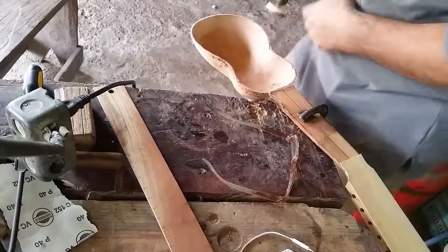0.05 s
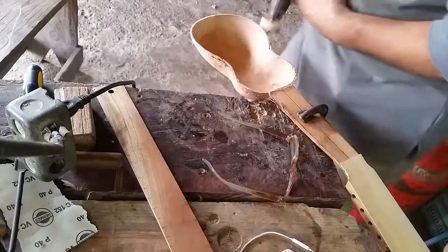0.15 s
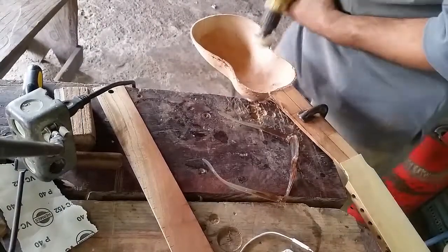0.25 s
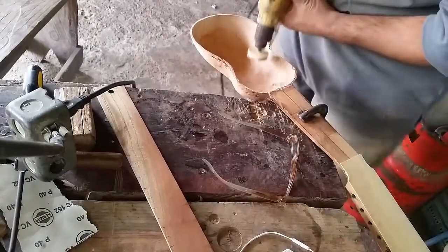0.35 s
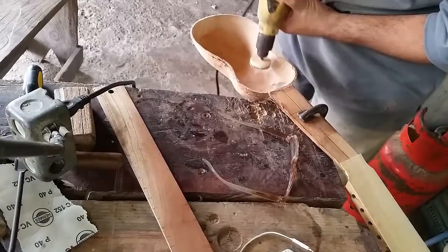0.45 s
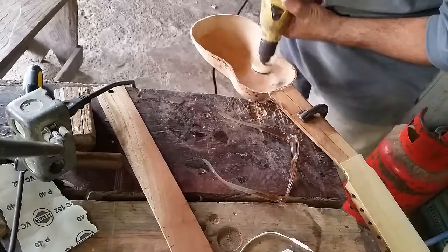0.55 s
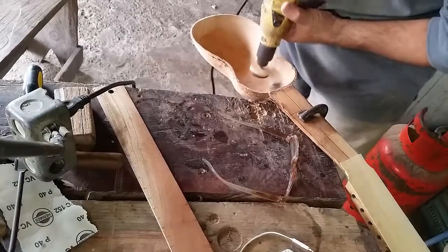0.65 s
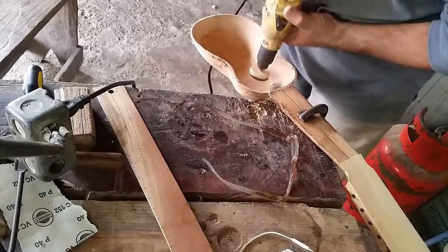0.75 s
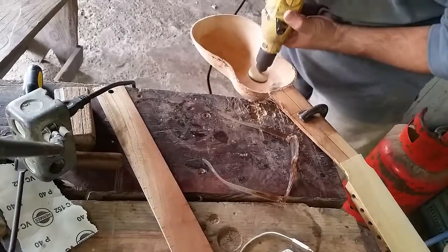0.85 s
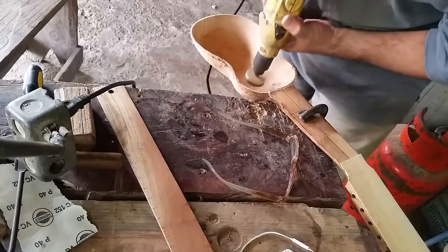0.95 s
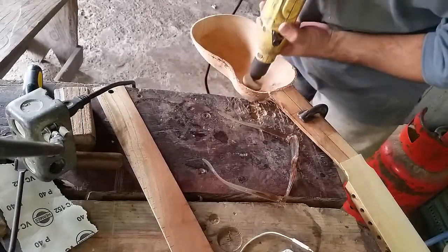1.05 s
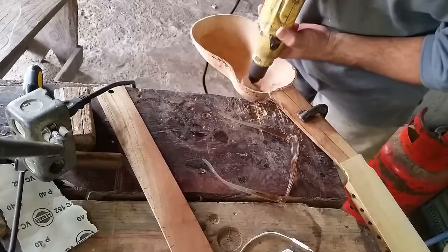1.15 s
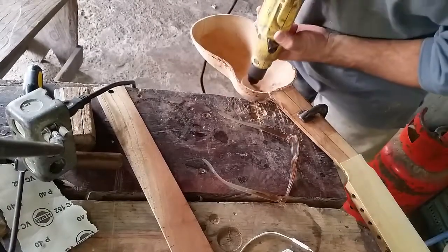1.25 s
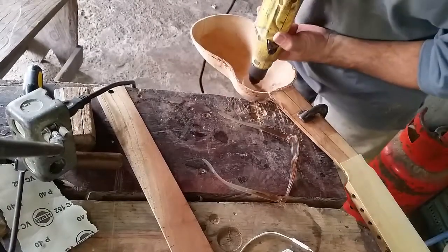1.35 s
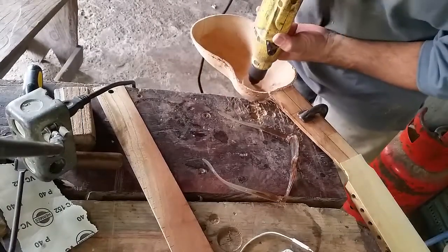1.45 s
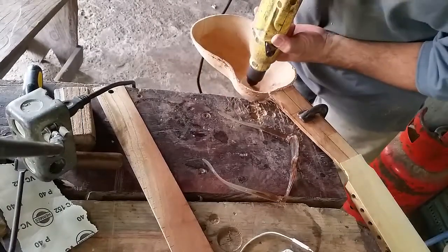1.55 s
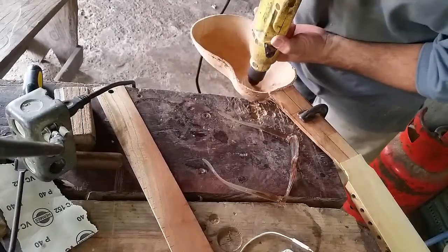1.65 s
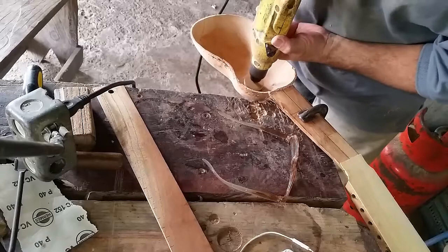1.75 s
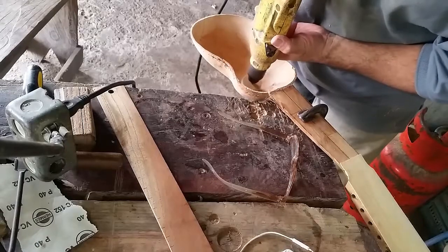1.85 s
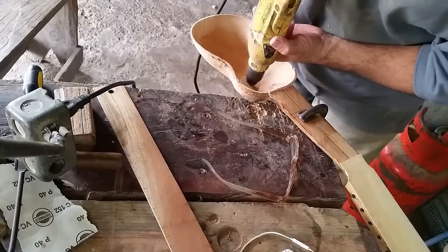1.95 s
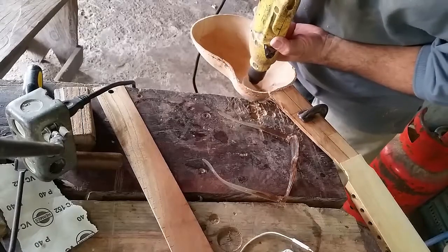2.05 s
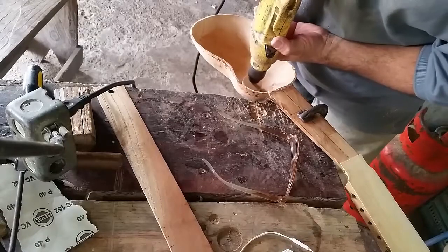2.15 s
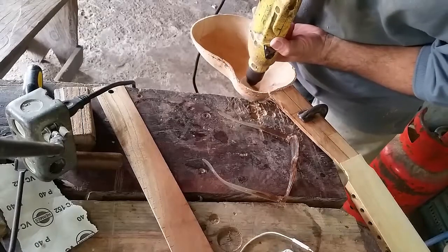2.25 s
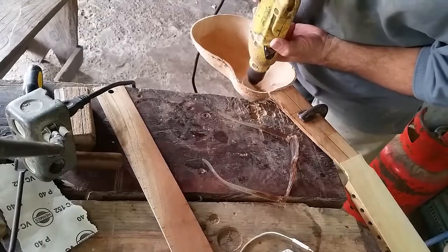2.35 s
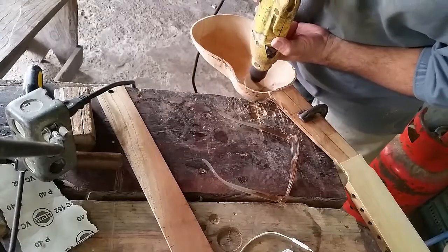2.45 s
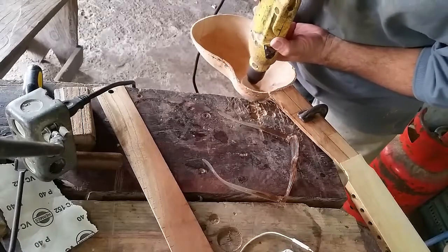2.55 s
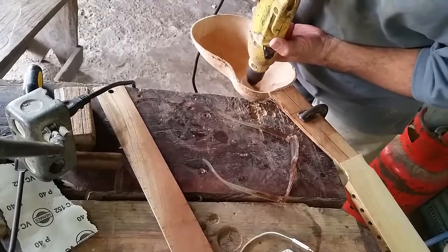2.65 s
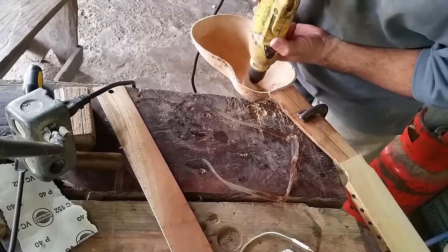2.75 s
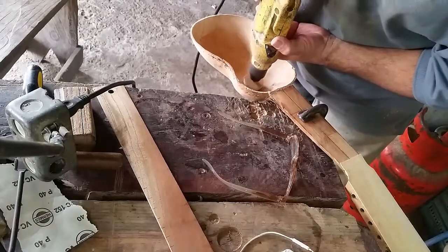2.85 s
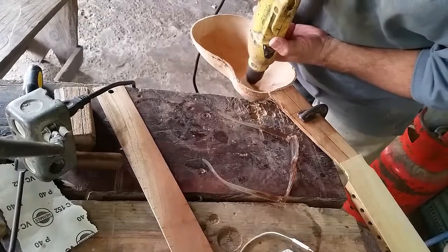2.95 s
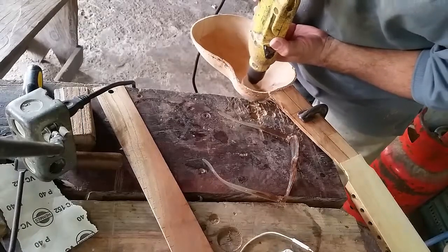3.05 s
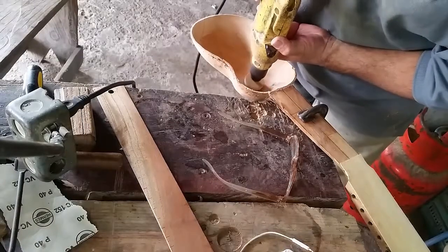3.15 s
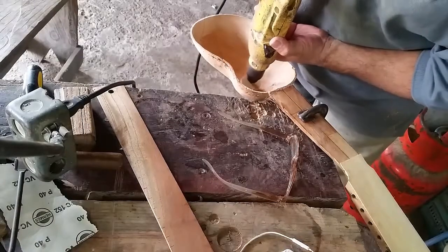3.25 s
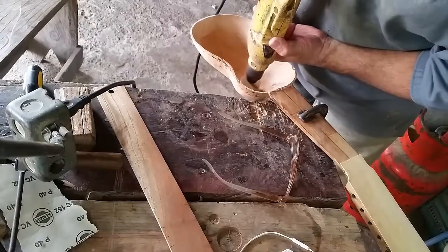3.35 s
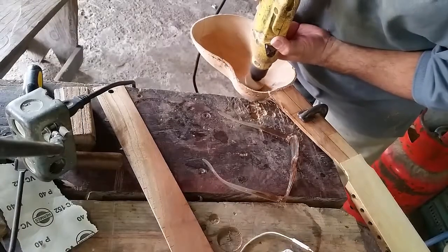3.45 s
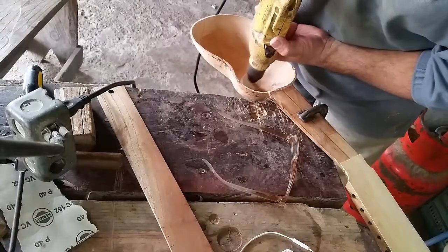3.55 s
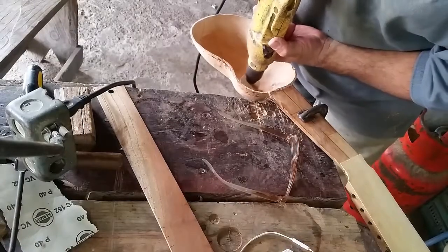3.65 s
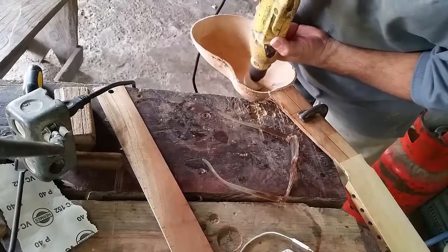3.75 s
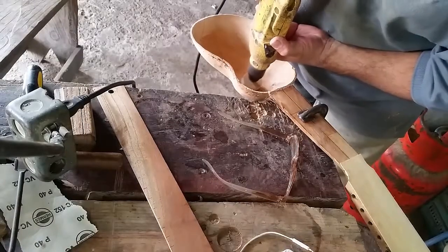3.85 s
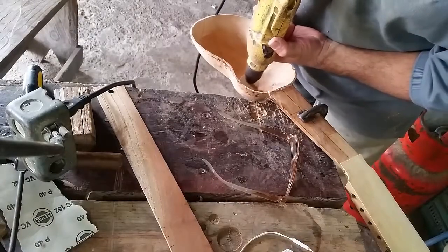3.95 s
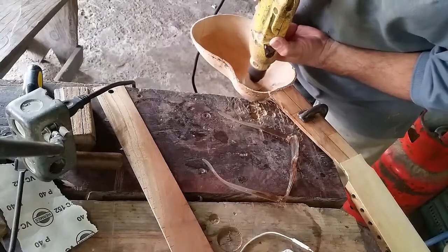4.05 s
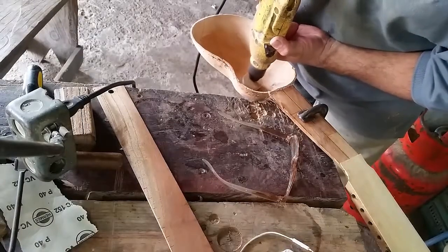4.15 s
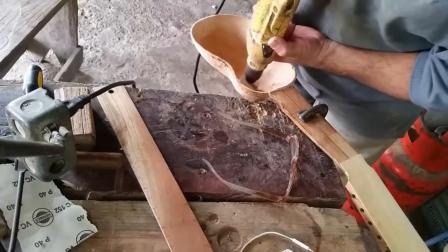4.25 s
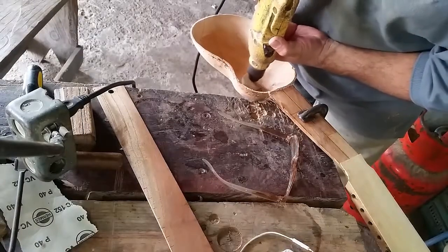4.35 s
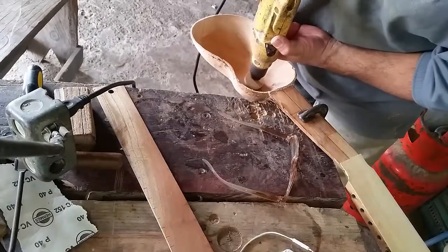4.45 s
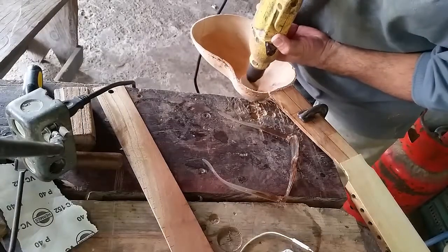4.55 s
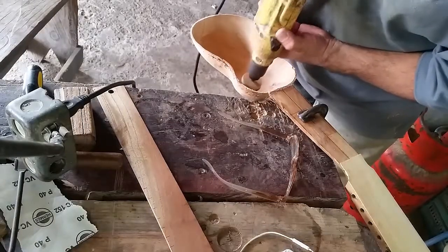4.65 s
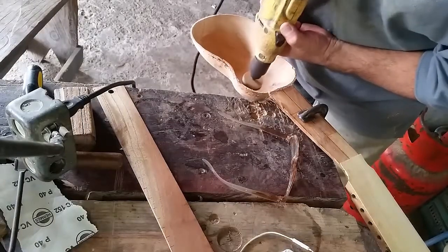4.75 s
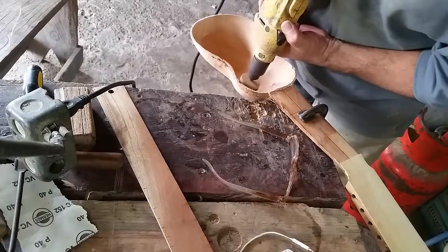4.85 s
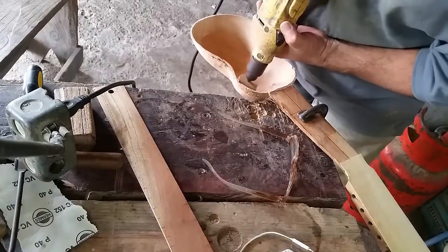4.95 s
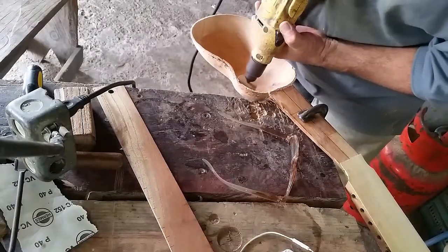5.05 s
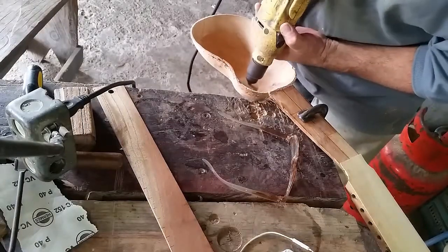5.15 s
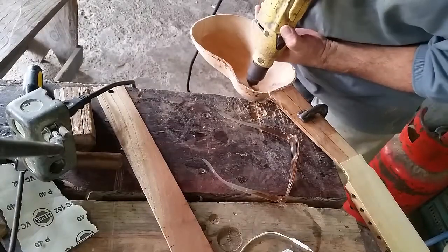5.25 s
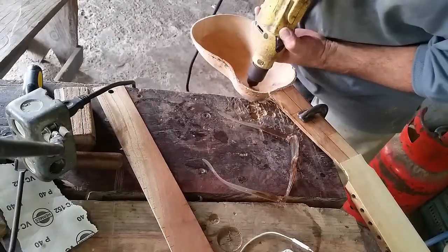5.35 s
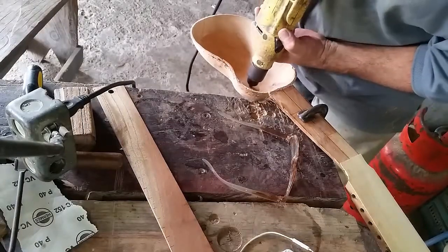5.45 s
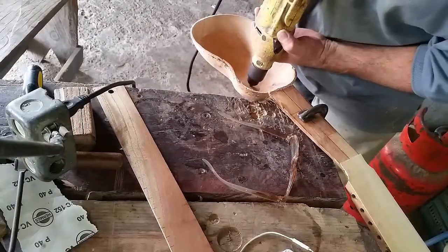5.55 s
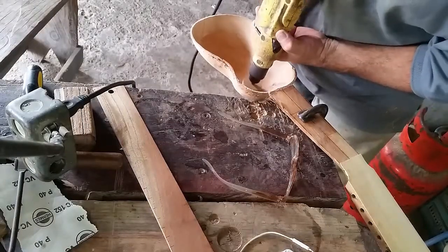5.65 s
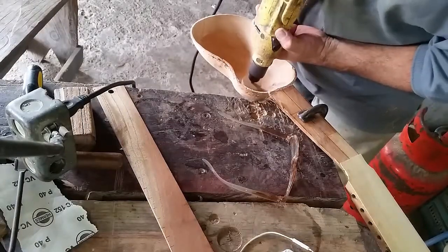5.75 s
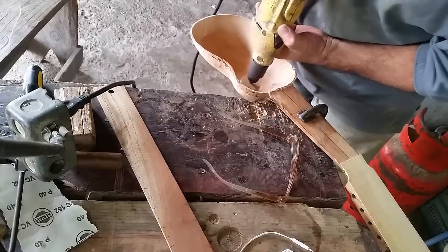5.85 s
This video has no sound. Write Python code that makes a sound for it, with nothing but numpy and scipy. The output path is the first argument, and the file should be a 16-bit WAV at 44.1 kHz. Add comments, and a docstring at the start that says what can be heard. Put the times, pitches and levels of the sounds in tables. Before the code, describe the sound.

An electric drill spins up to a high whine, its sanding drum rasping steadily inside a wooden bowl in short strokes.

```python
"""A machine hums in a workshop, then a corded drill clicks on, speeds up and sands a small wooden bowl.
The drill's cooling fan whines and its shaft buzzes, both rising in pitch as the motor gains speed.
Grit on the sanding drum scratches the wood inside a rush of air, and flares with each stroke.
The hum sinks away once the drill runs. Nearly all the sound reaches the left microphone."""
import sys
import numpy as np
from scipy import signal
from scipy.fft import rfft, irfft
from scipy.io import wavfile

SR = 44100
rng = np.random.default_rng(int(sys.argv[2]) if len(sys.argv) > 2 else 0)


def file_out(sig):
    """Save sig as 16-bit WAV at sys.argv[1]."""
    # one column per channel
    cols = np.atleast_2d(sig).T
    # limit, then scale
    lim = np.clip(cols, -1, 1)
    pcm = np.round(lim * 32767).astype(np.int16)
    wavfile.write(sys.argv[1], SR, pcm)


N = 259749
T = np.arange(N) / SR
HZ = np.fft.rfftfreq(N, 1 / SR)
START_S = 0.654  # the trigger is pulled
RUN_S = np.maximum(T - START_S, 0)  # time since then
BLADES, TOP_HZ = 13, 6433  # the fan's blades, and their pitch at full speed


def drill():
    """The whole drill at work. At first its tones and sparks throb strongly, its noise only a little."""
    blade_hz = fan_pitch()
    tones_and_sparks = (motor(blade_hz) + brush_sparks()) * current_throb(depth=.8, settle_s=.125)
    noises = (sanding(blade_hz) + gear_ring()) * current_throb(depth=.15, settle_s=.076)
    return tones_and_sparks + noises + switch_on()


def motor(blade_hz, jitter=0.00042, calm_s=0.81):
    """The fan and the shaft turn together, and are least steady while they gain speed."""
    unrest = np.exp(-RUN_S / calm_s)
    turns_per_s = blade_hz / BLADES * (1 + jitter * drift(29.2))
    angle = 2 * np.pi * np.cumsum(turns_per_s) / SR
    return fan_whine(blade_hz, BLADES * angle, unrest) + shaft_buzz(blade_hz, angle, unrest)


# How loud the whine is as the drill turns in the hand: time_s, level_db
WHINE_LEVELS = [(.66, -45), (1.3, -42), (1.6, -42.5), (1.82, -42.5), (1.95, -40.5), (2.02, -48),
                (2.29, -41.5), (2.5, -43.5), (2.9, -44.5), (3.45, -43), (3.95, -43.5), (4.62, -41.5),
                (4.76, -47), (5.2, -45.5), (5.48, -47), (5.67, -43.5), (5.89, -46)]
# Brief dips in the whine: time_s, half_width_s, gain_db
WHINE_DIPS = [(1.14, 0.023, -4), (1.7, .035, -10), (2.07, 0.037, -9), (2.38, 0.031, -8),
              (2.73, 0.083, -3.5), (3.24, .04, -5), (3.82, .025, -8), (4.79, .02, -8), (5.56, .025, -14),
              (5.79, 0.042, -24)]
# Pitches that the air vents boost or weaken: pitch_hz, width_hz, gain_db
VENT_RESONANCES = [(1200, 1150, -19), (2310, 1000, 14.5), (3000, 340, -9), (3480, 360, -18), (3880, 640, 9),
                   (4580, 1200, 5.5)]
# How loud the tone an octave above the whine is: time_s, level_db
OCTAVE_LEVELS = [(.78, -71.5), (.98, -58), (1.35, -58), (1.7, -47.5), (1.8, -51.5), (2.48, -45.5),
                 (2.72, -51), (2.98, -46.5), (3.8, -48), (3.9, -50), (4.62, -51), (4.71, -40.5),
                 (4.82, -47.5), (4.95, -45.5), (5.38, -53.5), (5.62, -44), (5.73, -55), (5.89, -53)]
def fan_whine(blade_hz, blade_angle, unrest, conversion_gap_hz=3900):
    """The fan blades make a whine and its octave. The recorder's rate conversion adds
    two thin, faint tones, 3900 Hz above the whine and 3900 Hz below the octave."""
    roughness = np.clip(.95 * (1 - blade_hz / TOP_HZ), 0, 1)
    whine_db = curve(WHINE_LEVELS) + bumps(WHINE_DIPS) + (1.1 + 2 * unrest) * drift(33)
    octave_db = curve(OCTAVE_LEVELS) + (2 + 2 * unrest) * drift(23)
    whine = amp(whine_db + boost_db(blade_hz, VENT_RESONANCES)) * rough_tone(blade_angle, roughness)
    octave = amp(octave_db) * rough_tone(2 * blade_angle, .9 * unrest)
    gap = 2 * np.pi * conversion_gap_hz * T
    under_octave = amp(octave_db - 10 + 1.5 * drift(33)) * rough_tone(2 * blade_angle - gap, roughness)
    over_whine = amp(whine_db - 16 + 1.5 * drift(33)) * rough_tone(blade_angle + gap, roughness)
    return np.sqrt(2) * (whine + octave + under_octave + over_whine * blade_hz / TOP_HZ)


# The tones in the shaft's buzz: cycles_per_turn, level_db
SHAFT_TONES = [(1, -60), (2, -55), (3, -54.5), (4, -53.5), (5, -57), (12, -56)]
# How the hand's grip changes all but the lowest tone: time_s, gain_db
GRIP_GAINS = [(1.3, 1), (1.8, -6), (2.3, -1), (2.52, 0), (2.9, -1), (3.55, 0), (4.1, 0.5), (4.45, 1.5),
              (5.0, -2), (5.4, 2.5)]
# Pitches that the drill's housing boosts or weakens: pitch_hz, width_hz, gain_db
HOUSING_RESONANCES = [(995, 26, 4), (4630, 420, 24), (5900, 500, -6)]
def shaft_buzz(blade_hz, angle, unrest, rattle_radians=.12, swing_dip_db=5.5):
    """The shaft buzzes at multiples of its speed: louder as it speeds up, softer as the hand swings."""
    shaken_angle = angle + rattle_radians * unrest * drift(150)
    grip_db, dip_db = curve(GRIP_GAINS), swing_dip_db * hand_swing(lag_s=-.005)
    buzz = np.zeros(N)
    for multiple, db in SHAFT_TONES:
        housing_db = boost_db(multiple * blade_hz / BLADES, HOUSING_RESONANCES)
        level_db = db + (multiple > 1) * grip_db - dip_db + housing_db + 1.5 * drift(14)
        buzz += amp(level_db) * np.sin(multiple * shaken_angle)
    return np.sqrt(2) * buzz * (blade_hz / TOP_HZ) ** 4.5


# The quick and the slow stage of speeding up: pitch_gained_hz, time_constant_s
SPIN_UP_STAGES = [(2885, .099), (3225, .4395)]
# The speed sags and recovers with the load: time_s, pitch_change_hz
LOAD_SAG = [(1.75, 4), (2.56, -10), (3.05, 6), (3.7, 4), (3.85, -21), (4.52, -52), (4.86, 22), (5.21, 67),
            (5.44, 36), (5.78, -22), (5.89, 0)]
def fan_pitch(lilt_hz=14.98):
    """The whine's pitch in Hz: it climbs, bends under load and lifts a little with each stroke."""
    still_to_gain_hz = sum(hz * np.exp(-RUN_S / lag_s) for hz, lag_s in SPIN_UP_STAGES)
    swing = hand_swing(lag_s=0.033)
    return TOP_HZ - still_to_gain_hz + curve(LOAD_SAG) + lilt_hz * (swing - swing.mean())


# The low, middle and high bands of the sanding noise:
# level_db, db_per_speed_db, deep_in_bowl_db, db_per_pressure_db
HOLLOW_BAND = (-48.5, -0.1, 2, 0.26)
RUSH_BAND = (-38.5, 0.7, 1.5, 0.03)
FIZZ_BAND = (-49, 1.63, 0.66, 0.88)
# How deep the drum sits in the bowl: time_s, depth_0_to_1
DRUM_DEPTHS = [(0.66, 0.4), (0.9, 0.66), (1.15, 1), (1.45, 0.66), (1.8, 0.4), (2.5, 0), (3.2, 0),
               (3.8, 0.05), (4.3, 0.1), (4.6, 0.5), (4.8, 1), (5.0, 0.8), (5.25, 1), (5.45, 0.55),
               (5.89, 0.54)]
# The drum catches on the grain and the rush swells: time_s, half_width_s, gain_db
GRAIN_CATCHES = [(1.82, .025, 1.3), (1.98, .015, 2.6), (2.06, .025, 3), (2.27, .03, 1.2), (2.46, .04, 1.5),
                 (3.15, .03, 1), (3.82, .03, 1.5), (4.35, .03, 0.8), (4.98, .03, 1.3), (5.53, .03, 1.5)]
# The drum lifts off the wood for a moment: time_s, half_width_s, gain_db
LIFT_OFFS = [(1.368, .012, -2.5), (1.49, .03, -1.2), (2.65, .05, -1.5), (4.59, .025, -1),
             (5.32, .015, -1.5)]
def sanding(blade_hz, gear_ratio=11.1, wobble_db=.5):
    """The drum rubs the wood. Each band of its noise follows the speed, depth and pressure."""
    depth, pressure_db = np.clip(curve(DRUM_DEPTHS), 0, 1), hand_pressure()
    speed_db = 20 * np.log10(blade_hz / TOP_HZ)
    rasp = wooden_bowl(grit_rasp())
    low, high = below(1800), 1 - below(5000)
    hollow = unit_in(colour(rasp, low), 700, 1400)
    rush = unit_in(colour(rasp, 1 - low - high), 1600, 5500) * amp(bumps(GRAIN_CATCHES))
    # The drum is not quite round, so the fizz pulses once a turn.
    drum_angle = 2 * np.pi * np.cumsum(blade_hz / BLADES / gear_ratio) / SR
    fizz = unit_in(colour(rasp, high), 7000, 12000) * amp(wobble_db * np.sin(drum_angle))
    out = np.zeros(N)
    for band, settings in [(hollow, HOLLOW_BAND), (rush, RUSH_BAND), (fizz, FIZZ_BAND)]:
        db, by_speed, deep_db, by_pressure = settings
        level_db = db + by_speed * speed_db + deep_db * depth + by_pressure * pressure_db
        out += band * amp(level_db + 0.48 * drift(12))
    return out * amp(bumps(LIFT_OFFS))


# The tone colour of the air and grit, from bass to treble: pitch_hz, gain_db
RASP_COLOUR = [(70, -46), (140, -43.5), (240, -14.5), (650, -11), (900, -6.5), (1380, -7.5), (2200, 2),
               (3400, -0.5), (4500, -3), (6000, -8), (8400, -13), (12300, -10), (14500, -13), (14700, -23)]
def grit_rasp(grains_per_s=5000, grit_share=0.3, chatter_db=.5):
    """Thousands of tiny scratches, each a click of its own size, mix with rushing air."""
    hits = rng.random(N) < grains_per_s / SR
    size_db = 2.5 * np.minimum(rng.exponential(1, N), 5)
    grit = hits * amp(size_db) * np.sign(noise())
    rasp = bench_echoes(noise() + grit_share * unit(grit))
    return colour(rasp * amp(chatter_db * drift(53)), amp(spectrum(RASP_COLOUR)))


# Where the drum works (0 the bowl's floor, 1 its rim, 2 deep against its wall): time_s, place
DRUM_PLACES = [(0.66, 0), (2.1, 0.18), (2.6, 1.18), (4.5, 1.12), (4.75, 1.75), (5.25, 1.9), (5.5, 1.46),
               (5.89, 1.6)]
# Pitches the bowl boosts or weakens: pitch_hz, width_hz, floor_gain_db, rim_gain_db, wall_gain_db
BOWL_RESONANCES = [(1062, 37, 6, 0, 7), (1420, 150, -2, -1, 0), (1570, 250, 1.5, 4, -2.5),
                   (1853, 100, -2.5, -6, -2), (2210, 130, -2, 3, -3.5), (2330, 800, -1, -1.6, 1.2),
                   (2720, 130, 3, 1, 2.5), (2990, 210, -1.5, 0, -3), (3285, 170, 0, -1.5, 7),
                   (3390, 100, 3.5, 1.5, 0.5), (3620, 400, 0, 2, -3.5), (4310, 280, 2.5, 3.5, 4.5),
                   (4640, 200, 0.5, -3.5, 5), (4870, 160, 4, 3.5, -1), (5400, 160, 5.5, 3, 5),
                   (11040, 500, -2.5, -2, -4.5)]
# The drum lingers and one pitch stands out: time_s, half_width_s, pitch_hz, width_hz, gain_db
BOWL_RINGS = [(1.05, .1, 3180, 90, 5.5), (1.17, .08, 3380, 90, 1), (1.27, .13, 1600, 90, 4),
              (1.33, .08, 1080, 50, 11), (1.7, 0.07, 1060, 50, 6), (1.9, .12, 1990, 50, 7),
              (2.03, 0.17, 2100, 50, 6), (2.03, .09, 2690, 70, 1), (2.07, .06, 4880, 150, -1),
              (2.36, .13, 2140, 60, 6), (2.53, .08, 4220, 60, 9), (4.45, .07, 4930, 200, 2),
              (4.75, .06, 4590, 60, -1), (4.94, 0.091, 4250, 200, 3), (5.42, .14, 1990, 40, 6),
              (5.47, .11, 2500, 50, 5.5)]
def wooden_bowl(rasp, wander=0.0064, grit_rings=50, low_hz=1450, high_hz=5200):
    """The bowl's resonances change as the drum moves and rocks; grit sets off brief rings at random."""
    hz, times, slices = signal.stft(rasp, SR, nperseg=2048, noverlap=1536)
    place = np.interp(times, T, curve(DRUM_PLACES))
    resonances = []
    for pitch_hz, width_hz, *gains_db in BOWL_RESONANCES:
        rocking = 1 + wander * np.interp(times, T, drift(4))
        resonances.append((pitch_hz * rocking, width_hz, np.interp(place, [0, 1, 2], gains_db)))
    rings = list(BOWL_RINGS)
    for when, height in rng.random((grit_rings, 2)):
        time_s = START_S + when * (T[-1] - START_S)
        rings.append((time_s, .035, low_hz * (high_hz / low_hz) ** height, 45, 5))
    for time_s, half_width_s, pitch_hz, width_hz, db in rings:
        resonances.append((pitch_hz, width_hz, db * np.exp(-((times - time_s) / half_width_s) ** 2)))
    shaped = slices * amp(boost_db(hz[:, None], resonances))
    return signal.istft(shaped, SR, nperseg=2048, noverlap=1536)[1][:N]


# The strokes that press the drum on the wood: start_s, length_s, pressure_db
HAND_STROKES = [(1.39, .05, 3.6), (1.65, .18, 4.6), (2.02, .13, 4.8), (2.35, .16, 4.0), (2.72, .17, 2.3),
                (3.03, .18, 2.2), (3.36, .14, 1.5), (3.68, .17, 1.6), (3.98, .08, 1.2), (4.31, .21, 1.8),
                (4.66, .09, 1.8), (4.97, .08, 1.0), (5.2, .07, 1.2), (5.43, .28, 2.4)]
def hand_pressure(bite_s=0.011, ease_s=0.047):
    """How hard the drum is pressed, in dB: each stroke bites, holds and eases off."""
    return sum(curve([(start, 0), (start + bite_s, db), (start + hold, db), (start + hold + ease_s, 0)])
               for start, hold, db in HAND_STROKES)


def hand_swing(lag_s, half_width_s=0.0554):
    """How fast the hand swings the drill into a stroke, from 0 to 1."""
    return bumps([(start_s + lag_s, half_width_s, 1) for start_s, _, _ in HAND_STROKES])


# The pitches at which the gear case rings: pitch_hz, width_hz, level_db, swell_s
GEAR_CASE_RINGS = [(1076, 390, -42.5, 0.2), (1503, 150, -47.5, 0.47), (3200, 990, -45, 0.39)]
def gear_ring(delay_s=0.059):
    """While the motor gains speed, the straining gears make their case ring."""
    out = np.zeros(N)
    for pitch_hz, width_hz, db, swell_s in GEAR_CASE_RINGS:
        ring = unit(colour(noise(), 1 / (1 + (2 * (HZ - pitch_hz) / width_hz) ** 2)))
        progress = np.maximum(RUN_S - delay_s, 0) / swell_s
        out += amp(db) * ring * progress * np.exp(1 - progress)
    return out


# The gear teeth knock as they take up their slack: start_s, level_db
GEAR_CLACKS = [(.654, -33), (.673, -34), (.682, -44), (.691, -40)]
def switch_on(snap_decay_s=.008, clack_decay_s=0.0049, ring_hz=790, ring_decay_s=0.01):
    """The switch snaps, the gears clack a few times and the housing rings briefly."""
    age = np.maximum(RUN_S - .001, 0)
    snap = amp(-59) * unit(colour(noise(), 1 - below(4700))) * np.exp(-age / snap_decay_s) * (age > 0)
    knocks = sum(amp(db) * (T > start_s) * np.exp(-np.maximum(T - start_s, 0) / clack_decay_s)
                 for start_s, db in GEAR_CLACKS)
    clacks = knocks * unit(colour(noise(), below(3900) * (1 - below(700)) / (1 + HZ / 2000)))
    ring = amp(-34) * np.sin(2 * np.pi * ring_hz * age) * np.exp(-age / ring_decay_s)
    return snap + clacks + ring


def brush_sparks(level_db=-47, fade_s=0.045, low_hz=2600, top_hz=5500):
    """The motor's sliding contacts spark under the starting current, then settle."""
    sparks = unit(colour(noise(), (1 - below(low_hz)) / (1 + (HZ / top_hz) ** 4)))
    return amp(level_db) * sparks * np.exp(-RUN_S / fade_s)


def current_throb(depth, settle_s, mains_hz=60):
    """The current switches on, throbs at twice the mains rate and soon evens out."""
    switched_on = np.clip(RUN_S / .0014, 0, 1)
    throb = np.cos(2 * np.pi * 2 * mains_hz * (RUN_S - .002))
    return switched_on * (1 + depth / (1 + (RUN_S / settle_s) ** 6) * throb)


def bench_echoes(sound, echo_db=-15, decay_s=0.01, echoes_per_s=2500):
    """Quick echoes off the workbench colour the sound, and shift as the hand moves."""
    out = sound
    for _ in range(3):
        echoes = noise() * (rng.random(N) < echoes_per_s / SR) * (T > .001) * np.exp(-T / decay_s)
        reflected = colour(sound, rfft(echoes / np.linalg.norm(echoes)))
        out = out + amp(echo_db) * reflected * drift(3.2) / np.sqrt(3)
    return out


# How loud the workshop's machine is: time_s, level_db
HUM_LEVELS = [(0, -49), (.1, -43.5), (.26, -46.5), (.35, -44), (.43, -52.5), (.48, -45.5), (.61, -47.5),
              (.68, -59), (.81, -53), (.93, -67), (1.5, -90)]
# The tones in its hum: pitch_hz, start_gain_db, change_over_first_second_db
HUM_TONES = [(70, -10, -3), (85, -1.5, -0.5), (169, -4.5, -6.5), (255.6, -17.5, 20.5), (388, -18.5, 2),
             (576, -19.5, -4), (653, -13.5, -5), (733, -15.5, -6)]
def machine_hum(pitch_waver=.007):
    """A machine hums with a few low, wavering tones that sink away once the drill runs."""
    level_db = curve(HUM_LEVELS) + drift(8.3)
    angle_per_hz = 2 * np.pi * np.cumsum(1 + pitch_waver * drift(10)) / SR
    tones = sum(amp(db + change_db * np.minimum(T, 1) + 1.5 * drift(27)) * np.sin(hz * angle_per_hz)
                for hz, db, change_db in HUM_TONES)
    return np.sqrt(2) * amp(level_db) * tones


# The tone colour of the room's soft noise: pitch_hz, gain_db
ROOM_COLOUR = [(30, -14), (50, 1), (68, -5), (105, 0.5), (250, -4), (310, -8), (700, -8), (1100, -12),
               (1800, -11), (2600, -17.5), (4500, -22.5), (6500, -38.5), (11000, -46.5), (15000, -66)]
def room_noise(level_db=-47, sink_start_s=0.93, sink_db_per_s=49):
    """A soft wash of noise fades slowly at first, then drops quickly once the drill runs."""
    wash = unit_in(colour(noise(), amp(spectrum(ROOM_COLOUR))), 300, 8000)
    fade_db = 7.5 * np.minimum(T, 1)
    sink_db = np.clip((T - sink_start_s) * sink_db_per_s, 0, 20.5)
    return amp(level_db - fade_db - sink_db) * wash


def faint_rumble(level_db=-74):
    """A faint rumble, unrelated on the left and right."""
    return amp(level_db) * np.array([unit(colour(noise(), 1 / (1 + HZ / 60))) for _ in range(2)])


def amp(db):
    """Turns decibels into a gain."""
    return 10 ** (np.asarray(db) / 20)


def unit(x):
    """Scales a sound to an average (rms) level of one."""
    return x / np.sqrt(np.mean(x ** 2) + 1e-20)


def unit_in(x, low_hz, high_hz):
    """Scales a sound so that one band has an average (rms) level of one."""
    return x / np.std(colour(x, (HZ > low_hz) & (HZ < high_hz)))


def curve(rows):
    """Joins (time_s, value) points with straight lines."""
    return np.interp(T, *np.transpose(rows))


def bumps(rows):
    """Smooth, brief swells from (time_s, half_width_s, height) rows."""
    return sum(height * np.exp(-((T - time_s) / width_s) ** 2) for time_s, width_s, height in rows)


def spectrum(points):
    """Joins (pitch_hz, db) points into a dB value for every frequency."""
    hz, db = np.transpose(points)
    return np.interp(np.log(HZ + 1), np.log(hz + 1), db)


def colour(x, gain):
    """Filters a sound with a gain for each frequency."""
    return irfft(rfft(x) * gain, N)


def below(hz):
    """Filter gains that keep what lies below this frequency."""
    return 1 / (1 + (HZ / hz) ** 8)


def boost_db(hz, resonances):
    """The dB that resonances add or take away at these frequencies."""
    return sum(db / (1 + (2 * (hz - centre) / width) ** 2) for centre, width, db in resonances)


def noise():
    """White noise: an even hiss."""
    return rng.standard_normal(N)


def drift(rate_hz, size=4096):
    """A random wander of about size one, mostly slower than this rate."""
    hz = np.fft.rfftfreq(size, T[-1] / size)
    slow = unit(irfft(rfft(rng.standard_normal(size)) / (1 + (hz / rate_hz) ** 2)))
    return np.interp(T, np.linspace(0, T[-1], size), slow)


def rough_tone(angle, roughness):
    """A pure tone, partly smeared into a narrow rasp."""
    return np.sqrt(1 - roughness ** 2) * np.sin(angle) + roughness * drift(400) * np.cos(angle)


def microphones(left, right, shade):
    """The left microphone is open; the right one is shaded, so it hears less."""
    return 2 * np.array([left, colour(right, amp(-spectrum(shade)))])


# How much weaker the drill and the room are on the right: pitch_hz, loss_db
DRILL_SHADE = [(100, 8), (200, 31), (700, 18.5), (1290, 61), (2380, 56.5), (4400, 51), (8120, 38),
               (15000, 41)]
ROOM_SHADE = [(60, 46), (200, 32), (380, 5.9), (700, 7.9), (2380, 21), (8120, 11), (15000, 9.3)]
def scene():
    """The drill in front, with the workshop behind it, in stereo."""
    tool = microphones(drill(), drill(), DRILL_SHADE)
    workshop = microphones(machine_hum() + room_noise(), machine_hum() + room_noise(), ROOM_SHADE)
    return tool + workshop + faint_rumble()


def record(dry):
    """Cuts the highest treble, above 15600 Hz."""
    low_pass = signal.firwin(511, 15600, window=("kaiser", 9), fs=SR)
    return signal.oaconvolve(dry, low_pass[None], "same")


dry = scene()
out = record(dry)
file_out(out)
```